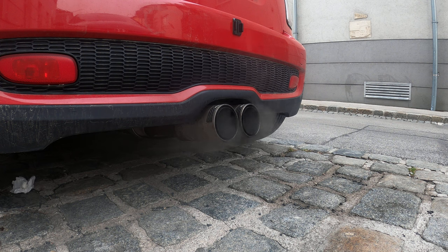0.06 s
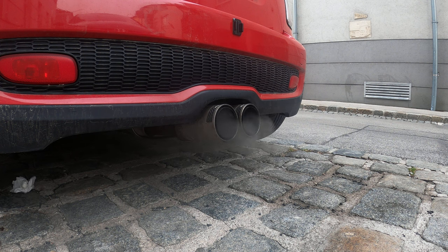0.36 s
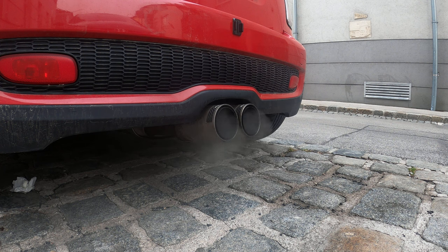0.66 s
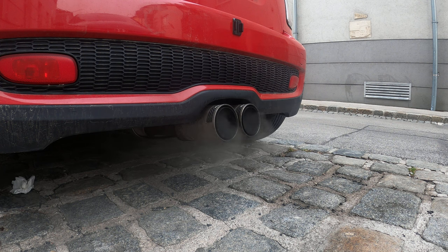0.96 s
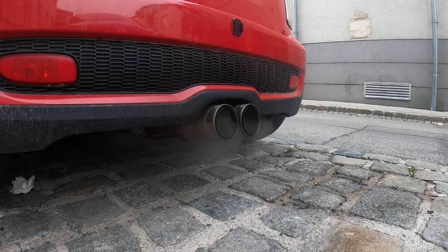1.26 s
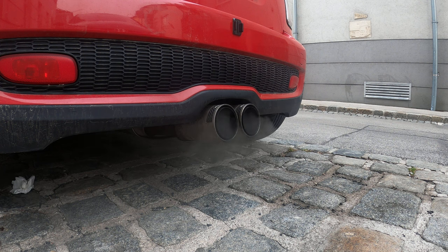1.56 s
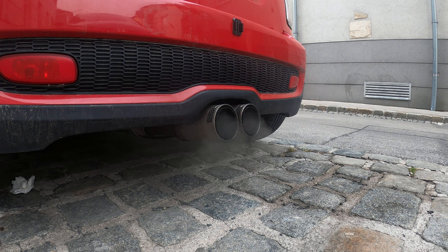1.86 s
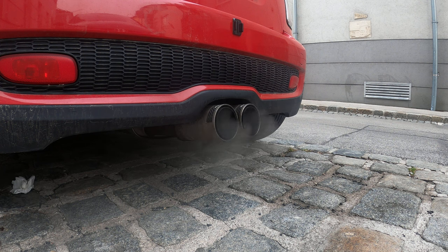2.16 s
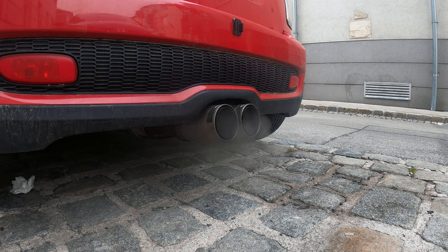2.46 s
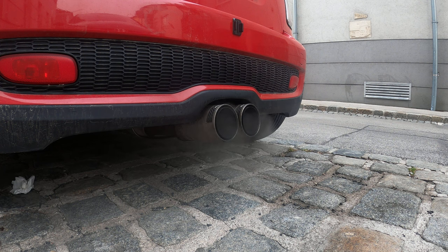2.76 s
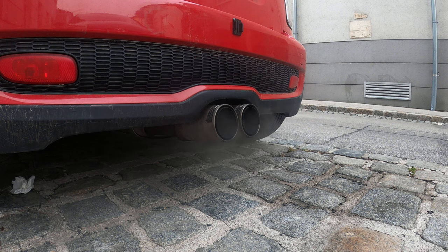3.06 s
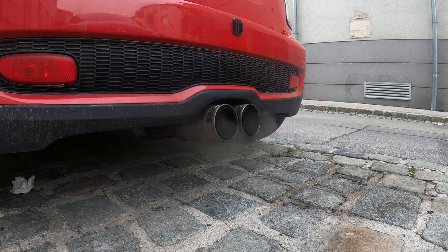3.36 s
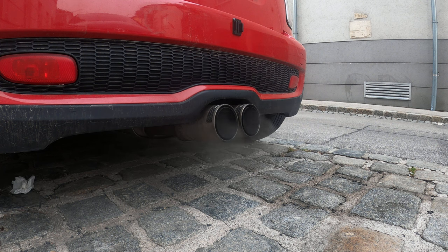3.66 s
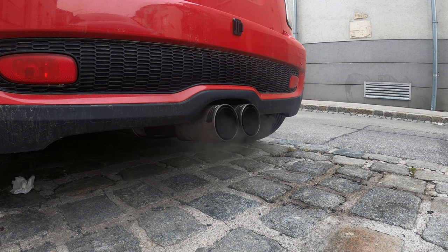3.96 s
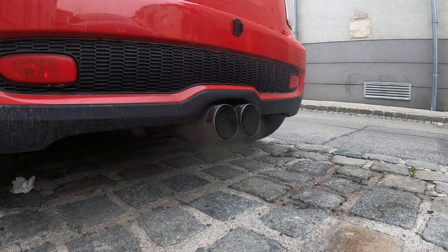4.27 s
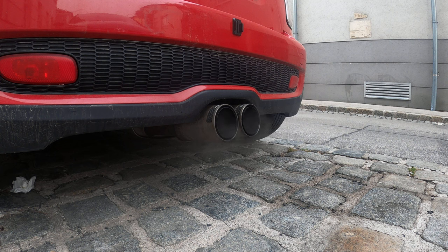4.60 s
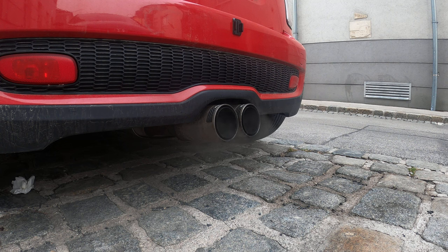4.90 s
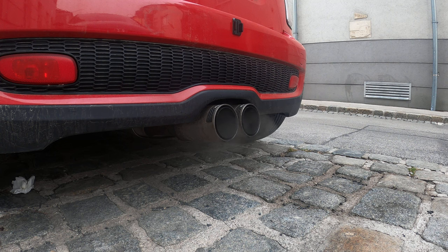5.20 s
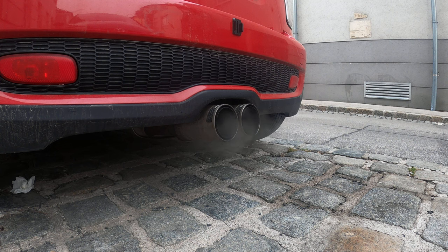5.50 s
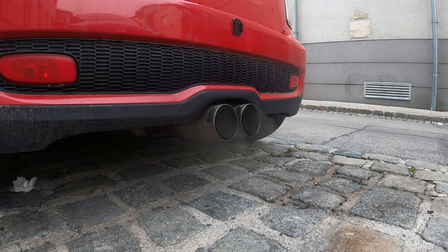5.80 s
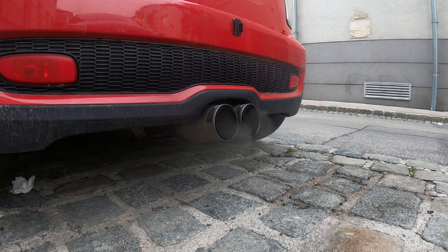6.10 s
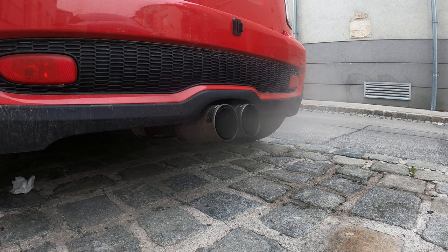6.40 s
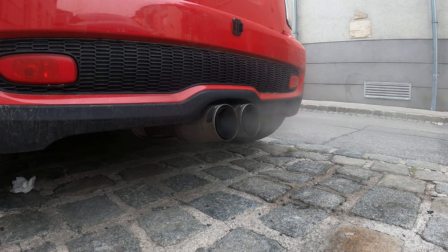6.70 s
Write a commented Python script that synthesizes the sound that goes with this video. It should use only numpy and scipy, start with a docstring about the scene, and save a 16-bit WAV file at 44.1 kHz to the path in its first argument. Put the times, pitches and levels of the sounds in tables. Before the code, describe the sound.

A four-cylinder car idles with a deep, loping exhaust rumble close by, then revs up briefly at the end.

```python
"""On a cobbled street, just behind its twin tailpipes, a four-cylinder car idles, then revs briefly.
Each firing is a pressure pulse that excites the resonators of the exhaust: it booms in the silencer,
rings the pipe and leaves the tip as a sharp puff. Turbulent gas adds rasp and hiss, and thin whines
follow the shaft. The exhaust spits now and then, and the sound drops out once for an instant."""
import sys
import numpy as np
from scipy.fft import rfft, irfft, next_fast_len
from scipy.io import wavfile

SR = 44100
rng = np.random.default_rng(int(sys.argv[2]) if len(sys.argv) > 2 else 0)


def store_pcm(level_fs):
    """Save levels as 16-bit WAV."""
    pcm = np.round(np.clip(level_fs, -1, 1) * 32767).astype(np.int16)
    wavfile.write(sys.argv[1], SR, np.atleast_2d(pcm).T)


N = 302085
TIME = np.arange(N) / SR
DROPOUT_S = (4.9885, 5.0098)
AUDIBLE = (TIME < DROPOUT_S[0]) | (TIME > DROPOUT_S[1])
THROTTLE_OPEN_S, THROTTLE_SHUT_S, ATTACK_S, RELEASE_S = 6.27, 6.745, 0.1, 0.17


def amp(db):
    """Amplitude ratio of a level in decibels."""
    return 10 ** (np.asarray(db) / 20)


def unit(x):
    """Normalisation to rms 1."""
    return x / np.sqrt(np.mean(x ** 2) + 1e-20)


def filtered(x, response):
    """Linear filtering: the spectrum of x times a frequency response."""
    m = next_fast_len(N + SR // 2)
    return irfft(rfft(x, m) * response(np.fft.rfftfreq(m, 1 / SR)), m)[:N]


def resonance(f, hz, width):
    """Frequency response of a damped oscillator."""
    return 1j * f * width / (hz * hz - f * f + 1j * f * width)


def ring(x, modes, low_hz, high_hz):
    """Modal superposition: x drives modes that radiate between two band edges; rms 1."""
    body = filtered(x, lambda f: sum(amp(db) * resonance(f, hz, width) for hz, width, db in modes))
    band = lambda f: 1 / np.sqrt((1 + (low_hz / (f + 1)) ** 10) * (1 + (f / high_hz) ** 20))
    return unit(filtered(body, band))


def noise(spectrum):
    """White noise shaped by a spectral envelope; rms 1."""
    hz, db = np.transpose(spectrum)
    envelope = lambda f: amp(np.interp(np.log(f + 1), np.log(hz), db))
    return unit(filtered(rng.standard_normal(N), envelope))


def pulses(times, sizes):
    """An impulse train with the given times and sizes."""
    return np.bincount(np.clip(np.round(times * SR).astype(int), 0, N), sizes, N + 1)[:N]


def scatter(db, spread_db):
    """Cycle-to-cycle variation: gains that differ a little at each firing."""
    return amp(db + spread_db * rng.standard_normal(len(db)))


# Each row: time in seconds, firing rate in Hz.
FIRING_RATE = [(0.0, 34.4), (1.33, 34.23), (1.57, 32.5), (2.24, 33.07), (2.68, 32.54), (3.46, 32.47),
               (3.69, 31.58), (4.04, 31.9), (5.5, 32.01), (5.7, 31.23), (5.9, 32.32), (6.14, 31.27),
               (6.25, 32.6), (6.42, 48.97), (6.6, 79.42), (6.71, 89.82), (6.85, 81.62)]

def engine_timing():
    """Phase is the integral of frequency: a cylinder fires at each whole cycle."""
    rate = np.interp(TIME, *np.transpose(FIRING_RATE))
    flow = np.clip((rate - 33) / 55, 0, 1)  # 0 at idle, 1 at the top of the rev
    cycle = np.cumsum(rate * AUDIBLE) / SR - .41
    firings = np.interp(np.arange(int(cycle[-1]) + 2), cycle, TIME, right=2 * TIME[-1])
    return rate, flow, cycle, firings


RATE_HZ, FLOW, CYCLE, FIRINGS_S = engine_timing()


def pressure_steps(times, sizes):
    """One impulse per firing, scaled so that mean power is independent of the rate; rms 1."""
    return unit(pulses(times, sizes) / np.sqrt(RATE_HZ))


def bursts(sizes, rise, fall):
    """Turbulence swells and decays once per firing; rise and fall are in cycles."""
    nearest = np.floor(CYCLE + .5).astype(int)
    age = CYCLE - nearest
    fall = np.broadcast_to(fall, sizes.shape)[nearest]
    envelope = np.exp(-np.where(age < 0, (age / rise) ** 2, age / fall))
    return unit(sizes[nearest] * envelope * rng.standard_normal(N))


def load_gain(idle_db, hard_db, stumble_db, throttle_db):
    """Level follows load: a hard idle eases off, stumbles, then takes the throttle with a lag."""
    hard = np.interp(TIME, [3.1, 4.54], [1, 0])
    stumble = np.exp(-((TIME - 6.25) / 0.036) ** 2)
    opened = 1 - np.exp(-np.maximum(TIME - THROTTLE_OPEN_S, 0) / ATTACK_S)
    throttle = opened * np.exp(-np.maximum(TIME - THROTTLE_SHUT_S, 0) / RELEASE_S)
    return amp(idle_db + hard_db * hard + stumble_db * stumble + throttle_db * throttle)


# Engine noise. Each row: frequency in Hz, relative spectral density in dB.
WASH_SPECTRUM = [(60, -28.5), (200, -15), (480, -6), (700, 8), (870, -3), (1080, 0.5), (1400, -5),
                 (1750, 0.5), (2000, -3), (2650, -3.5), (3050, -12.5), (3400, -4.5), (3800, -21.5),
                 (4160, -11), (4700, -30.5), (7000, -62)]

def engine_wash():
    """Stationary broadband noise from the engine under the car."""
    return amp(-44) * noise(WASH_SPECTRUM)


def whine(multiple, db, flutter_hz):
    """Amplitude modulation: low-pass noise flutters a tone locked to the shaft."""
    flutter = filtered(rng.standard_normal(N), lambda f: 1 / (1 + (f / flutter_hz) ** 2))
    tone = np.sin(2 * np.pi * multiple * np.cumsum(RATE_HZ) / SR)
    return amp(db) * unit(flutter * tone)


# Each row: multiple of the firing rate, level before filtering in dB, flutter bandwidth in Hz.
SHAFT_ORDERS = [(269.2, -62.5, 88), (161, -71, 60)]

def shaft_whines(cutoff_hz=6700):
    """Two orders track the shaft: the upper swells through a resonance, the lower is low-passed."""
    upper, lower = [whine(*row) for row in SHAFT_ORDERS]
    upper = filtered(upper, lambda f: resonance(f, hz=8930, width=290))
    lower = filtered(lower, lambda f: 1 / (1 + (f / cutoff_hz) ** 10))
    return upper + lower


# Each row: peak time in seconds, level in dB, pitch in Hz, bandwidth in Hz, half-length in seconds.
SPLUTTERS = [(4.169, -29.5, 560, 263, 0.01), (4.172, -38, 840, 413, 0.017), (5.14, -36.5, 1150, 404, 0.019),
             (6.413, -26.5, 2010, 700, 0.0023), (6.59, -20, 600, 494, 0.002)]

def exhaust_spits():
    """Band-limited noise under brief Gaussian envelopes is heard as soft splutters."""
    out = np.zeros(N)
    for peak_s, db, hz, width, half_s in SPLUTTERS:
        splutter = unit(filtered(rng.standard_normal(N), lambda f: resonance(f, hz, width) ** 2))
        out += amp(db) * splutter * np.exp(-((TIME - peak_s) / half_s) ** 2)
    return out


# Escaping gas. Each row: frequency in Hz, relative spectral density in dB.
HISS_SPECTRUM = [(3000, -19), (4200, 2), (4600, -4), (5100, -5), (5500, -9), (6100, -9), (6600, -6.5),
                 (7300, -11), (8700, -11), (9800, -20), (11100, -26), (12400, -23.5), (15500, -29.5)]

def gas_hiss():
    """Flow noise, modulated at the firing rate more deeply as the flow rises."""
    return noise(HISS_SPECTRUM) * (1 + .5 * FLOW * np.cos(np.pi * CYCLE) ** 2)


# Modes of the tailpipe mouth, and higher modes of the tips.
# Each row: frequency in Hz, bandwidth in Hz, relative level in dB.
MOUTH_MODES = [(1667, 89, -7.5), (1750, 73, -1)]
TIP_MODES = [(2190, 200, 0), (2640, 130, -4.5), (2840, 110, -6), (3360, 170, -3), (3620, 220, -11),
             (4160, 160, -14)]

def tailpipe_puffs(puff_db):
    """Impulse and turbulence excite the outlet: a soft chirp at idle, bright and ragged at speed."""
    gust = scatter(puff_db, spread_db=1.65)
    jitter_s = .0003 * rng.standard_normal(len(gust))
    snap = pressure_steps(FIRINGS_S - .0008 + jitter_s, gust)
    puff = lambda: bursts(gust, rise=.055, fall=.065) + .8 * FLOW * rng.standard_normal(N)
    chirp = ring(puff() + .9 * snap, MOUTH_MODES, low_hz=1450, high_hz=1816)
    spray = ring(puff() + .2 * snap, TIP_MODES, low_hz=1880, high_hz=3780)
    return (1 - 0.26 * FLOW) * chirp + (.5 + .25 * FLOW) * spray


# Each row: frequency in Hz, bandwidth in Hz, relative level in dB.
CHAMBER_MODES = [(575.4, 45, 4), (641.6, 45, 3), (703, 32, -2.5), (940, 33, -31), (1052, 60, -8),
                 (1386, 250, -10)]

def chamber_rasp(opening_s, rasp_db, rush):
    """Cavity resonance: gas bursts excite the short chambers and merge into a jet at speed."""
    bark = scatter(rasp_db, spread_db=2.0)
    jet = .55 * np.sqrt(FLOW) * rng.standard_normal(N)
    drive = jet + pressure_steps(opening_s, bark) + .8 * bursts(bark, rise=.13, fall=.75 * rush)
    return ring(drive, CHAMBER_MODES, low_hz=446, high_hz=1210)


# Each row: frequency in Hz, bandwidth in Hz, relative level in dB.
GROWL_MODES = [(121, 88, 2.5), (258, 69, -4), (465, 45, 2)]

def throttle_growl(opening_s, push):
    """Forced response: under throttle, low harmonics of the firing rate drive broad resonances."""
    return .5 * np.sqrt(FLOW) * ring(pressure_steps(opening_s, push), GROWL_MODES, low_hz=93, high_hz=540)


# Each row: frequency in Hz, bandwidth in Hz, relative level in dB.
PIPE_MODES = [(186.3, 10.7, 2), (296.7, 26, -0.5), (378.8, 20.5, 11), (393.1, 15, 7.5), (484.3, 5.6, -8.5)]

def pipe_ring(opening_s, push, rush, turbulent, early):
    """Standing waves in the long pipe; one cylinder drives them out of step, so the idle lopes."""
    idling = np.interp(FIRINGS_S, TIME, FLOW) < .1
    steps = pressure_steps(opening_s - idling * early / RATE_HZ[0], push)
    ragged = np.interp(RATE_HZ, [35, 48], [1, .75])  # combustion firms up under load
    turbulence = .36 * ragged * bursts(push * turbulent, rise=.2, fall=rush)
    return (1 - 0.094 * FLOW) * ring(steps + turbulence, PIPE_MODES, low_hz=141, high_hz=464)


def silencer_boom(overrun_s=6.77, overrun_db=2.5):
    """Two resonators in series round each pulse into a deep swing, greatest near their own pitch."""
    # the charges collapse when the throttle shuts, and one heavy push follows
    charges = scatter(np.where(FIRINGS_S > THROTTLE_SHUT_S, -14, 0), spread_db=0.66)
    drive = pulses(np.append(FIRINGS_S - .003, overrun_s), np.append(charges, amp(overrun_db)))
    return unit(filtered(drive, lambda f: resonance(f, hz=50.8, width=26.7) ** 2))


# The cylinders in firing order. Each row: relative pipe, rasp and puff levels in dB, decay of the
# gas rush in cycles, relative turbulence, early opening in cycles.
FIRING_ORDER = [(1.5, -1, -1.5, 0.46, 0.4, 0.014), (1.5, 1, 0, 0.26, 0.58, 0.2522),
                (5.5, -2.5, -0.5, 0.13, 0.15, 0.0038), (2.5, -3.5, 0, 0.06, 0.075, 0.0079)]

def exhaust():
    """Source and filter: each firing sends a pressure step and a rush of gas into the resonators."""
    cylinder = np.arange(len(FIRINGS_S)) % len(FIRING_ORDER)
    pipe_db, rasp_db, puff_db, rush, turbulent, early = np.array(FIRING_ORDER)[cylinder].T
    boom = silencer_boom()
    # the valve opens just before the gas peaks
    opening_s = FIRINGS_S - .0028 + .00006 * rng.standard_normal(len(FIRINGS_S))
    push = scatter(pipe_db, spread_db=.45)
    pipe = pipe_ring(opening_s, push, rush, turbulent, early) - throttle_growl(opening_s, push)
    rasp = chamber_rasp(opening_s, rasp_db, rush)
    puffs = tailpipe_puffs(puff_db)
    return (boom * load_gain(-15.5, hard_db=0.44, stumble_db=-6.5, throttle_db=-4.5)
            + pipe * load_gain(-26.5, hard_db=2.5, stumble_db=-12, throttle_db=10.5)
            + rasp * load_gain(-43, hard_db=3, stumble_db=-5.5, throttle_db=17)
            + puffs * load_gain(-44.5, hard_db=2.5, stumble_db=-15, throttle_db=9)
            + gas_hiss() * load_gain(-57.5, hard_db=1.1, stumble_db=0, throttle_db=5.5))


def scene():
    """Superposition of the tailpipes close by and the fainter engine, in one channel."""
    return (exhaust() + shaft_whines() + engine_wash() + exhaust_spits())[None]


def record(dry, click_hz=900, top_hz=15700):
    """Gating and band limiting: the sound cuts out for an instant, with a click at each edge."""
    edges = pulses(np.array(DROPOUT_S), amp(2) * np.array([1, -1]))
    clicks = filtered(edges, lambda f: 1 / (1 + 1j * f / click_hz))
    return filtered(dry[0] * AUDIBLE + clicks, lambda f: f < top_hz)[None]


dry = scene()
out = record(dry)
store_pcm(out)
```